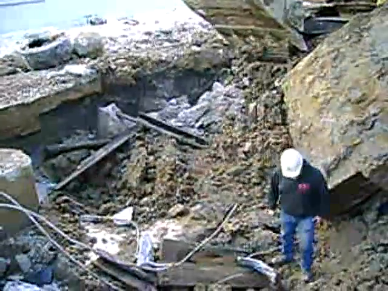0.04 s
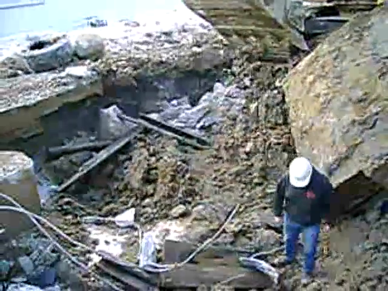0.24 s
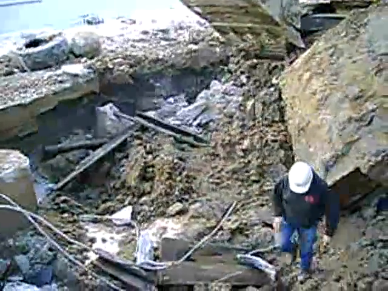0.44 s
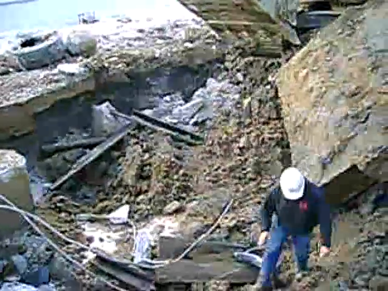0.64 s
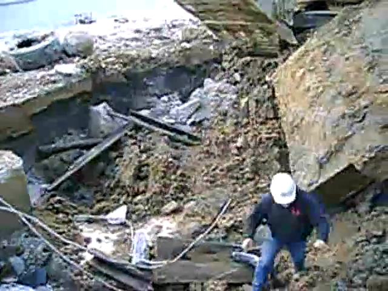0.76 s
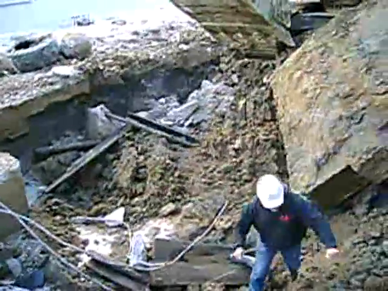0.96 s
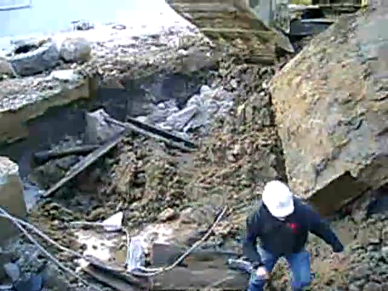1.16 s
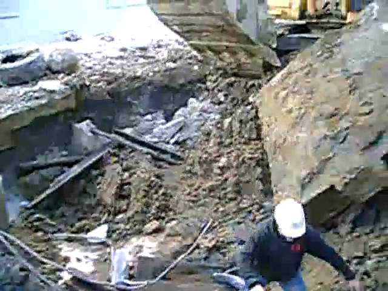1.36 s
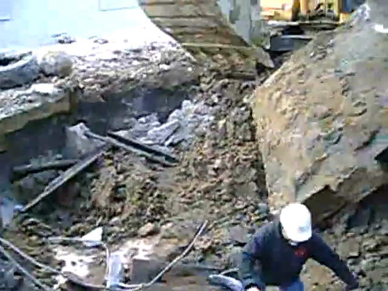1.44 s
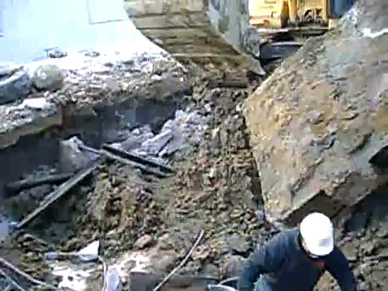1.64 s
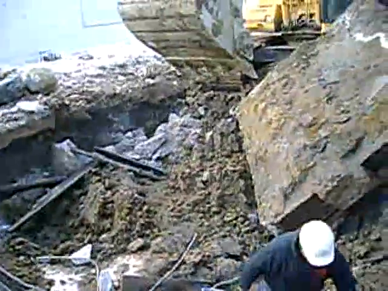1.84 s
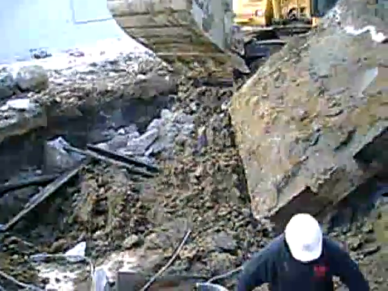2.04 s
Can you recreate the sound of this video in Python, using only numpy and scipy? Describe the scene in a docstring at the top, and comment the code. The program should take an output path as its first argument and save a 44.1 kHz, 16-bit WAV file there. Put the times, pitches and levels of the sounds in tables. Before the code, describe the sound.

An excavator's diesel engine hums and clatters steadily while wind gusts buffet the microphone outdoors.

```python
"""In a demolition pit, an excavator's diesel engine runs steadily while wind gusts buffet the microphone.
The exhaust is a stack of sine waves over filtered-noise rumble; a second low drone beats against it.
Bursts of noise make the block's knocks and ticks, and finer ones make a quick treble chatter.
Gears whine as wavering sines and the fan is a steady rush of noise.
Gusts are low noise with a staggering whistle-like tone, and the strongest add dull slaps of air."""
import sys
import numpy as np
from scipy import signal
from scipy.fft import rfft, irfft
from scipy.io import wavfile
from scipy.ndimage import uniform_filter1d

SR = 44100
rng = np.random.default_rng(int(sys.argv[2]) if len(sys.argv) > 2 else 0)


def unload_wav(signal):
    """Save mono or channel-first audio to the path in sys.argv[1] as 16-bit WAV at rate SR, clipped to [-1, 1]."""
    wavfile.write(
        sys.argv[1],
        SR,
        np.round(np.clip(np.atleast_2d(signal).T, -1, 1) * 32767).astype(np.int16),
    )


N = 92433  # length in samples, about 2.1 s

FIRING_HZ = 44.74  # how often the engine fires
SHAFT_SWING_DB = 1.5  # knocks and chatter grow and shrink this much over each shaft turn


def undb(db):
    """Turn decibels into a gain."""
    return 10 ** (np.asarray(db) / 20)


def level(x, db):
    """Scale a sound so that its average (rms) level is db."""
    return x * undb(db) / np.sqrt(np.mean(x ** 2))


def noise():
    """White noise: all pitches at once, equally strong."""
    return rng.standard_normal(N)


def walk(rate):
    """Smooth random drift with an rms of 1; rate is in new values per second."""
    step_len = max(int(SR / rate), 1)
    steps = rng.standard_normal(size=2048)
    path = np.interp(np.arange(N) / step_len, np.arange(len(steps)), steps)
    return level(uniform_filter1d(path, step_len // 2 + 1), 0)


def colour(x, points):
    """Filter a sound through a curve of (f/Hz, gain/dB) points."""
    hz, db = np.array(points, float).T
    f = np.maximum(np.fft.rfftfreq(N, 1 / SR), 1)
    gain = undb(np.interp(np.log(f), np.log(hz), db))
    return irfft(rfft(x) * gain, N)


def tone(hz):
    """A sine wave of rms 1 that follows a pitch curve, starting at a random phase."""
    cycles = np.cumsum(hz) / SR + rng.random()
    return np.sqrt(2) * np.sin(2 * np.pi * cycles)


# Colour of the turbulence at the microphone port: [f as a ratio to the eddy centre, shape/dB]
TURBULENCE_COLOUR = [(.12, -17.5), (.35, -3.5), (.65, -3), (1, -3.5), (1.8, -5.5), (3, -8.5), (5, -24),
                     (11, -31), (22, -60.5), (32, -64)]


def eddies(centre_hz):
    """Turbulent air at the microphone: noise gathered around a centre frequency, 3 dB below rms 1."""
    points = [(ratio * centre_hz, gain) for ratio, gain in TURBULENCE_COLOUR]
    return level(colour(noise(), points), -3)


# Gusts on the microphone; the gain acts on eddies and vortex together:
# [start t/s, hold t/s, gain/dB, eddy centre f/Hz, vortex level/dB before the gain]
GUST_LIST = [(0.004, 0.026, -19, 480, -3.5), (0.023, 0.083, -18, 290, -6), (0.052, 0.028, -19, 135, 0),
             (0.124, 0.039, -20, 195, -5.5), (0.575, 0.0064, -25.5, 300, -0.5),
             (0.589, .012, -30.5, 160, -2), (0.821, 0.013, -24, 105, -3), (0.853, 0.019, -25, 255, 0),
             (1.011, 0.021, -27.5, 220, 4), (1.048, 0.019, -17, 290, -2.5),
             (1.083, 0.034, -21.5, 280, -0.5), (1.156, 0.036, -16, 185, -3.5),
             (1.202, 0.017, -22.5, 170, -4.5), (1.295, 0.13, -26, 270, -6), (1.667, 0.039, -24.5, 190, -4),
             (1.724, 0.072, -23.5, 175, -1), (1.835, 0.032, -16, 180, -2.5), (1.871, 0.055, -16, 215, -2.5)]
GUST_ATTACK_S, GUST_RELEASE_S = 0.0098, 0.011  # straight rise; fall to 37 %
VORTEX_WANDER, VORTEX_RATE_HZ = 0.22, 170  # pitch spread (natural log), new values per second


def wind(t):
    """Gusts rise, hold and die away over a light breeze; each sheds a vortex whose pitch staggers."""
    out = undb(-44) * eddies(170)  # the light breeze
    for start, hold, db, hz, vortex_db in GUST_LIST:
        rise = np.clip((t - start) / GUST_ATTACK_S + 1 / 2, 0, 1)  # half-way up at the start time
        fall = np.exp(-np.maximum(t - start - hold, 0) / GUST_RELEASE_S)
        pitch = hz * np.exp(VORTEX_WANDER * walk(VORTEX_RATE_HZ))
        vortex = undb(vortex_db) * tone(pitch)
        out = out + undb(db) * rise * fall * (eddies(hz) + vortex)
    return out


# Slaps of air where the strongest gusts hit the microphone: [t/s, starting gain/dB, decay t/s]
SLAPS = [(1.167, -14, 0.01), (1.862, -11, 0.0055), (1.9321, -13, 0.0023)]
# Colour of the slaps: [f/Hz, shape/dB]
SLAP_COLOUR = [(150, -14.5), (400, -1), (680, 0.5), (1200, -8), (2200, -22.5), (4500, -23), (6500, -49.5)]


def slaps(t):
    """Dull slaps of air: noise that starts at once and quickly dies away, then is filtered."""
    burst = sum(undb(db) * (t >= start) * np.exp(-np.abs(t - start) / decay)
                for start, db, decay in SLAPS)
    air = noise()
    steady_size = np.std(colour(air, SLAP_COLOUR))
    return colour(burst * air, SLAP_COLOUR) / steady_size


# Colour of the rush from fan and engine bay: [f/Hz, shape/dB]
FAN_COLOUR = [(110, -19.5), (200, -4.5), (290, -6.5), (370, -8.5), (460, -5), (560, -5.5), (700, -6.5),
              (860, -3.5), (1000, -2.5), (1200, -8), (1600, -11.5), (1950, -10.5), (2200, -15), (2430, -12),
              (2800, -15), (3200, -19.5), (4100, -21.5), (4660, -20), (5300, -35), (6100, -35.5),
              (6850, -53)]


def fan():
    """Cooling air makes a broad rush of noise, slightly restless in level."""
    flicker = undb(0.5 * walk(24.95))
    return level(colour(noise(), FAN_COLOUR) * flicker, -26)


# Wavering gear and pump tones: [f/Hz, level/dB]
WHINE_TONES = [(357, -60), (423, -46), (456, -51.5), (708, -46.5), (753.5, -39.5), (801, -53.5),
               (945, -42.5), (997, -44.5), (1053, -40.5), (1253, -48), (1281, -59.5), (1401, -48),
               (1509, -52.5), (1609, -51), (1737, -48), (1901, -47), (2396, -48)]
WHINE_WANDER, WHINE_FLUTTER_DB = 0.0035, 2.5  # pitch spread (share), level spread
# Strongest gear tone over time: [t/s, level/dB]
MESH_CURVE = [(0, -30), (.3, -41), (.7, -42.5), (.8, -34), (1.45, -36.5), (1.7, -40.5), (2.1, -31)]
MESH_HZ, MESH_WANDER = 871.3, 0.0018  # pitch, pitch spread (share)


def gears(t, speed):
    """One strong gear tone swells and fades among others that waver in pitch and level."""
    mesh_pitch = MESH_HZ * speed * (1 + MESH_WANDER * walk(30))
    out = tone(mesh_pitch) * undb(np.interp(t, *np.array(MESH_CURVE).T))
    for hz, db in WHINE_TONES:
        pitch = hz * speed * (1 + WHINE_WANDER * walk(30.28))
        flutter = undb(WHINE_FLUTTER_DB * walk(11.47))
        out = out + level(tone(pitch) * flutter, db)
    return out


# Colour of the treble chatter: [f/Hz, shape/dB]
CHATTER_COLOUR = [(800, -15.5), (2000, -4), (2600, 0.5), (3600, -4), (4700, -4), (5700, -6.5), (6500, -20)]
CHATTER_HZ, CHATTER_WANDER = 122.6, 0.012  # ticks per second, rate spread (share)
CHATTER_DECAY_S, CHATTER_SCATTER_DB = 0.0019, 3


def chatter(t):
    """Likely the hydraulic pump: a nearly even train of tiny ticks that swells once per shaft turn."""
    rate = CHATTER_HZ * (1 + CHATTER_WANDER * walk(25))
    stroke, phase = np.divmod(np.cumsum(rate) / SR, 1)  # which tick, and how far through it
    size_db = CHATTER_SCATTER_DB * rng.standard_normal(size=512)[stroke.astype(int)]
    turn_db = SHAFT_SWING_DB * np.cos(np.pi * FIRING_HZ * t)
    ticks = undb(size_db + turn_db) * np.exp(-phase / (CHATTER_HZ * CHATTER_DECAY_S))
    return level(colour(noise() * ticks, CHATTER_COLOUR), -47)


# Ring of the engine block and its covers: [f/Hz, shape/dB]
BLOCK_RING = [(300, -15), (600, 1), (950, 2.5), (1400, -1.5), (2150, -18), (2450, -8), (3300, -10),
              (4100, -14), (4700, -9), (5500, -15), (6500, -36.5)]


def knocks(times, sizes, decay_s):
    """Each hit is a burst of dying noise, coloured by the ring of the engine block."""
    hits = np.zeros(N)
    np.add.at(hits, (times * SR).astype(int) % N, sizes)
    envelope = signal.lfilter([1], [1, -np.exp(-1 / (decay_s * SR))], hits)
    return colour(noise() * envelope, BLOCK_RING)


KNOCK_DB, KNOCK_DECAY_S, KNOCK_JITTER_S = -33.5, 0.0033, 0.0017
TICK_DB, TICK_DECAY_S, TICK_SCATTER_DB = -40.5, 0.00048, 5.5


def clatter():
    """Injectors and valves knock three times per firing, harder once per shaft turn; loose parts tick."""
    grid = np.arange(0, N / SR, 1 / (3 * FIRING_HZ))
    late = KNOCK_JITTER_S * rng.standard_normal(len(grid))
    turn_db = SHAFT_SWING_DB * np.cos(np.pi * FIRING_HZ * grid)
    valves = knocks(grid + late, undb(turn_db), KNOCK_DECAY_S)
    tick_times = rng.uniform(0, N / SR, size=220)
    scatter = np.minimum(rng.standard_normal(len(tick_times)), 1)  # no very loud ticks
    ticks = knocks(tick_times, undb(TICK_SCATTER_DB * scatter), TICK_DECAY_S)
    return level(valves, KNOCK_DB) + level(ticks, TICK_DB)


# Colour of the low engine rumble: [f/Hz, shape/dB]
RUMBLE_COLOUR = [(12, -8), (28, -2.5), (42, -3.5), (60, -3.5), (82, -6), (110, -3), (160, -8.5), (210, -7),
                 (400, -51.5)]


def rumble():
    """The engine's deep rumble, made of low filtered noise."""
    return level(colour(noise(), RUMBLE_COLOUR), -30.5)


def drone(speed):
    """A nearby low tone, close enough in pitch to beat against the lowest exhaust tone."""
    return undb(-38.5) * tone(51 * speed)


# Exhaust tones: [f as a multiple of the firing rate, level/dB]
EXHAUST_TONES = [(1, -29.5), (3, -33), (4, -42), (5, -47)]


def exhaust(speed):
    """Regular firing makes a hum of sine waves at whole multiples of the firing rate."""
    return sum(undb(db) * tone(k * FIRING_HZ * speed) for k, db in EXHAUST_TONES)


def scene():
    """The wind and the running machine together, in mono."""
    t = np.arange(N) / SR
    speed = 1 + 0.00193 * walk(4.04)  # the engine speed drifts by a tiny share
    surroundings = wind(t) + slaps(t)
    machine = fan() + gears(t, speed) + chatter(t) + clatter()
    engine_lows = rumble() + drone(speed) + exhaust(speed)
    return (surroundings + machine + engine_lows)[None]


def record(dry):
    """The small camera rounds the loudest peaks and cuts the treble above 6600 Hz."""
    ceiling = 0.45
    rounded = ceiling * np.tanh(dry / ceiling)
    treble_cut = signal.ellip(10, 0.2, 85, 6600, fs=SR, output="sos")
    return signal.sosfilt(treble_cut, rounded)


dry = scene()
out = record(dry)
unload_wav(out)
```